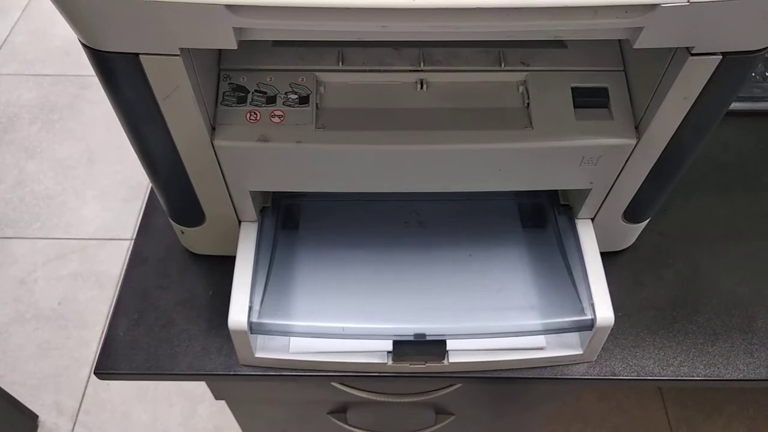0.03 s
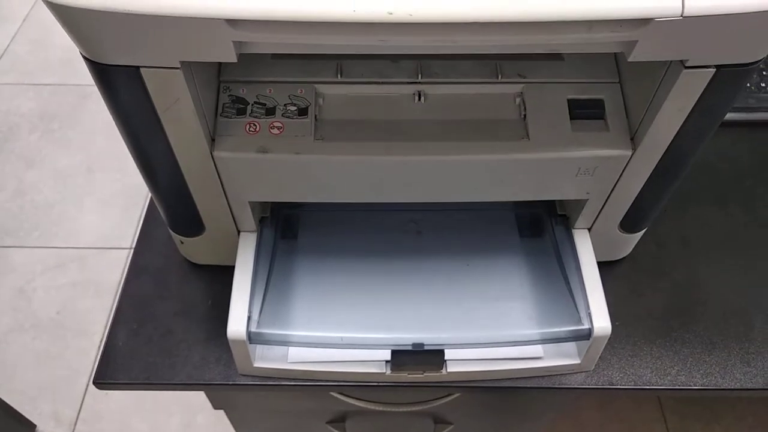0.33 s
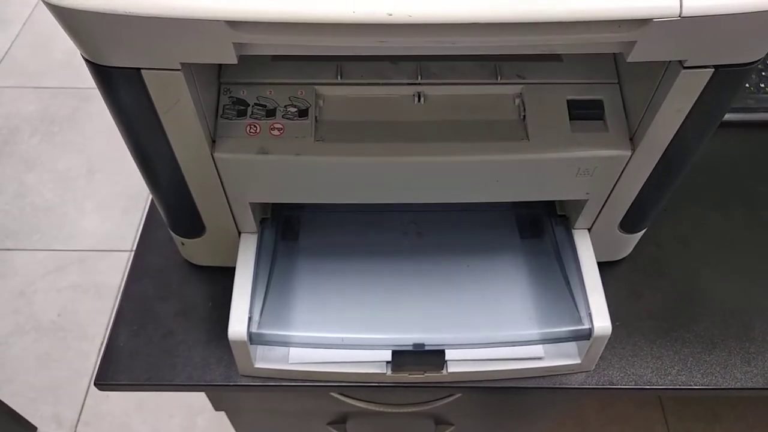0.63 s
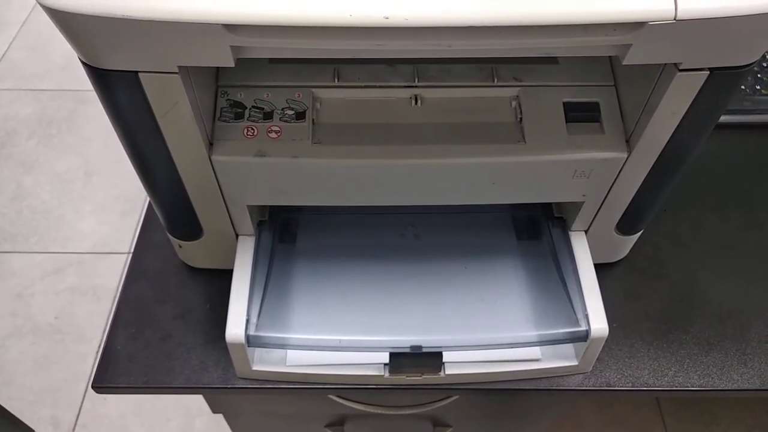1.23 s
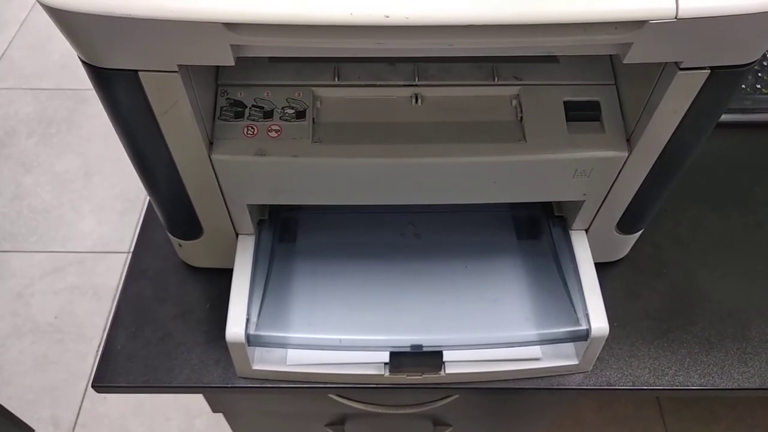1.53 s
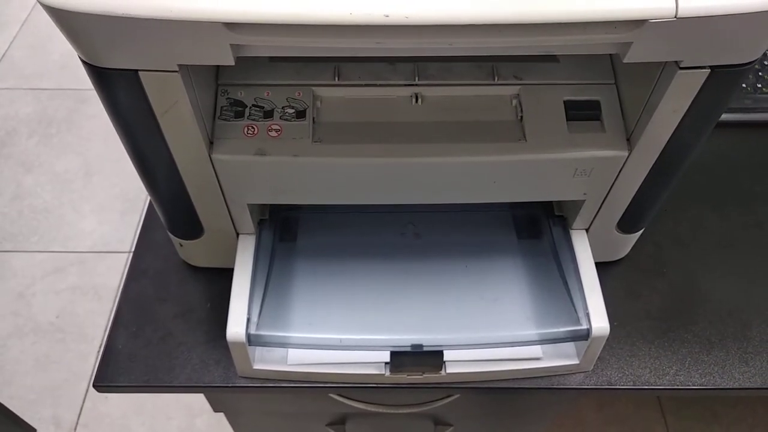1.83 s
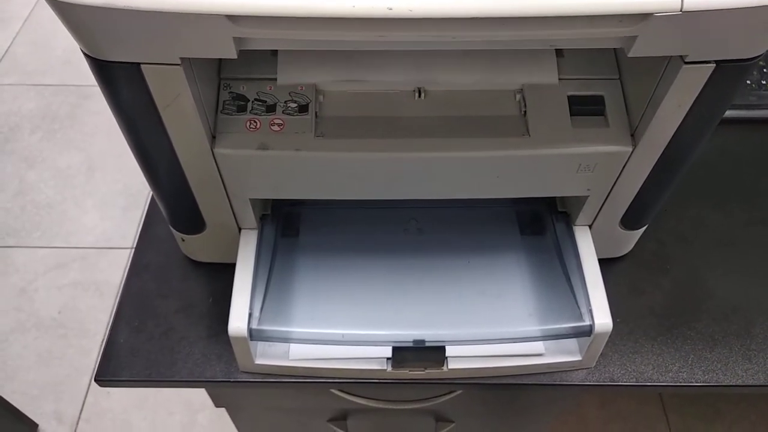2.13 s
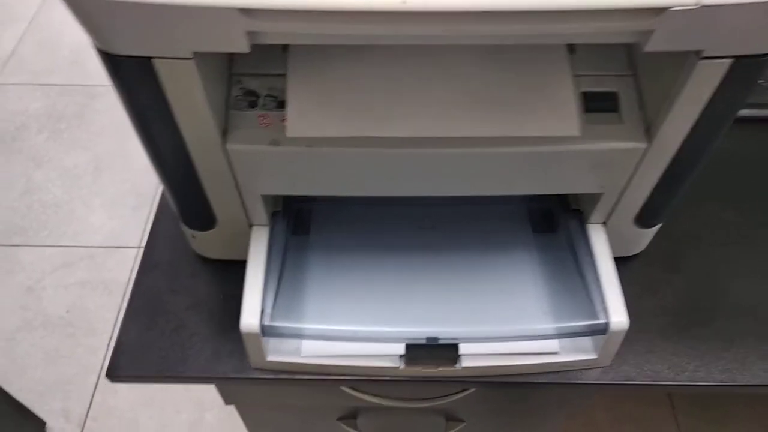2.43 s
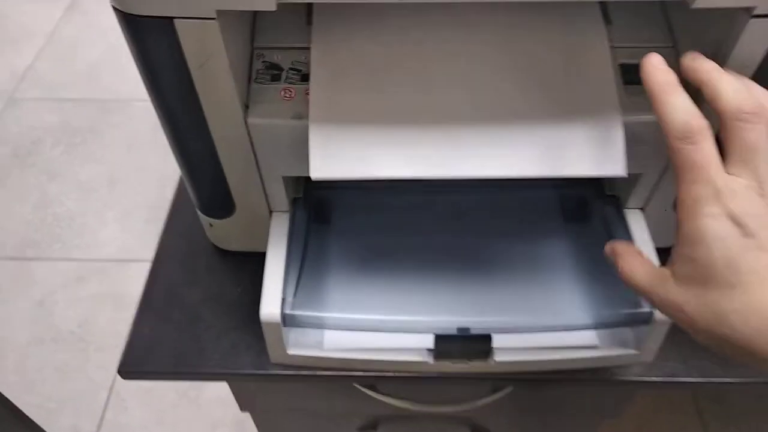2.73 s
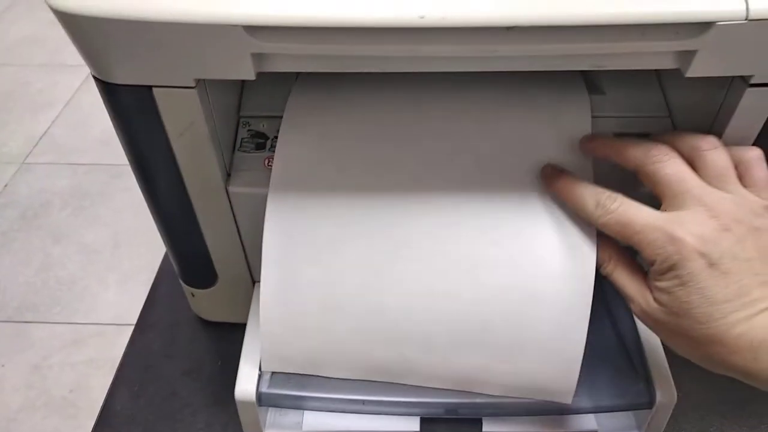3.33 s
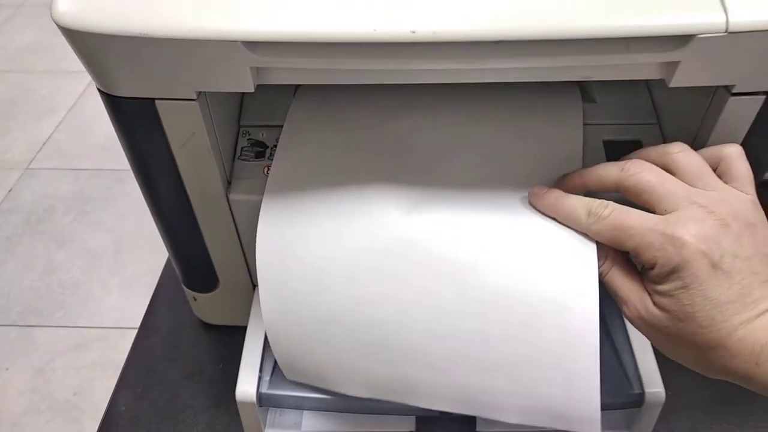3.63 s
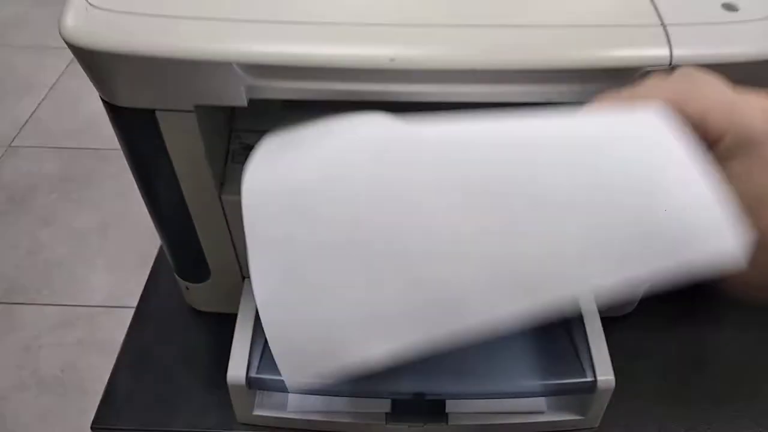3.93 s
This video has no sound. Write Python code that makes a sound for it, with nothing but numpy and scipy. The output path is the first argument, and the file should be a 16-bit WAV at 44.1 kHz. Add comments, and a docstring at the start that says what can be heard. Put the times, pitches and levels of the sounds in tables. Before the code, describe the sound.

Close above its tray in a small room, a printer hums while gears rattle briefly and paper hisses through the rollers. Scattered clicks lead to a single hard clack, and the sheet brushes softly against a hand.

```python
"""A small room, the microphone pair just above the tray of a desktop laser printer feeding out a sheet.
Paper rasps and hisses in the rollers, levers click and the feed gears rattle, over the hum of fan
and motors. The sheet brushes the guides and the hand that takes it. Late on, a sprung lever strikes
home with one hard clack that rings the plastic housing and overloads the right microphone."""
import sys
import numpy as np
from scipy import signal
from scipy.fft import rfft, irfft
from scipy.io import wavfile

SR = 44100
rng = np.random.default_rng(int(sys.argv[2]) if len(sys.argv) > 2 else 0)


def inscribe(sig):
    """Save sig as 16-bit PCM at rate SR to the path in sys.argv[1].

    A 1-D sig is mono; a 2-D sig holds one channel per row.
    Samples are clipped to [-1, 1] before scaling.
    """
    pcm = np.round(np.clip(np.atleast_2d(sig).T, -1, 1) * 32767)
    wavfile.write(sys.argv[1], SR, pcm.astype(np.int16))


N = 176400
TIME = np.arange(N) / SR


# The sheet's run through the rollers. Each row: time in seconds, rasp level in dB, hiss level in dB.
FEED_LEVELS = [(0, -64, -58.5), (.2, -59, -58.5), (.4, -60.5, -54), (.7, -59, -53), (1.05, -57, -54.5),
               (1.25, -56.5, -52.5), (1.85, -56.5, -51), (2.15, -56, -54.5), (2.45, -55, -55),
               (2.8, -55.5, -59), (3.15, -56.5, -56.5), (3.45, -63.5, -57.5), (4, -61.5, -57.5)]
# Roller rasp, then paper hiss, from close up. Each row: frequency in Hz, relative level in dB.
RASP_SPECTRUM = [(300, -24), (900, -6), (1500, 0.5), (2600, 0.5), (3300, -1.5), (4300, -4), (6000, -8),
                 (16000, -15)]
HISS_SPECTRUM = [(1500, -29), (4200, -8), (5600, -5), (7200, 1.5), (8300, -2), (9500, -7), (11500, -11),
                 (14000, -11), (16000, -30)]
# The sliding sheet's resonance. Each row: time in seconds, frequency in Hz, level in dB.
SHEET_RESONANCE = [(0, 1850, -60), (.85, 1850, -70), (1.15, 1800, -66), (1.19, 1750, -59),
                   (1.5, 1580, -57.5), (1.65, 1650, -65.5), (2.3, 1503, -59.5), (2.7, 1380, -62),
                   (2.95, 1380, -60), (3.2, 1300, -82), (4, 1300, -82)]
def paper(width_hz=430):
    """Friction in the rollers makes grainy noise; the sheet's resonance sinks as it comes out."""
    rasp, hiss = (evened(rng.standard_normal((2, N)) + amp(-5) * grains(per_s=1500, spread_db=-0.5))
                  for _ in range(2))
    rasp_db, hiss_db = curves(FEED_LEVELS)
    friction = amp(rasp_db) * colour(rasp, RASP_SPECTRUM) + amp(hiss_db) * colour(hiss, HISS_SPECTRUM)
    friction *= amp(0.82 * wander(rate_hz=39))
    hz, db = curves(SHEET_RESONANCE)
    carrier = np.exp(2j * np.pi * np.cumsum(hz) / SR)
    pole = np.exp(-np.pi * width_hz / SR)
    slips = signal.lfilter([1], np.poly([pole, pole]), grains(per_s=2000, spread_db=1.5))
    sheet = amp(db) * evened((carrier * slips).real)
    return at_microphones(friction + sheet)


CLACK_S = 3.2519
# The crack of the lever landing. Each row: frequency in Hz, relative level in dB.
CRACK_SPECTRUM = [(60, -31), (300, -2.5), (480, -24), (800, -6.5), (1300, 6.5), (2200, 2.5), (3300, -2.5),
                  (4500, -4), (6200, -4), (7500, -6), (9000, -13), (12000, -24), (16000, -21)]
# The plastic housing. Each row: frequency in Hz, relative level in dB, seconds to fall 60 dB.
HOUSING_MODES = [(308, -12.5, 0.134), (703, -17.5, 0.1), (993, -9, 0.081), (1320, 3.5, 0.057),
                 (1510, -25, 0.038), (1720, -28, 0.07), (2170, 7, 0.027), (2515, 2, 0.035),
                 (2790, 1, 0.022), (3470, -17, 0.026), (4323, -1, 0.04), (4800, -16, .025),
                 (5940, 9, 0.017), (6600, -2, 0.023)]
def clack(right_lag_s=0.00014):
    """A sprung lever strikes home and rings the housing: louder on the right, earlier on the left."""
    age = np.maximum(TIME - CLACK_S, 0)
    first_contact = 2.07 * (np.arange(N) == round(CLACK_S * SR))
    chatter = amp(-11) * (TIME >= CLACK_S) * np.exp(-age / 0.0014) * rng.choice([-1, 1], (2, N))
    crack = colour(first_contact + chatter, CRACK_SPECTRUM)
    ring = sum(amp(db - 60 * age / t60) * np.sin(2 * np.pi * hz * age) for hz, db, t60 in HOUSING_MODES)
    left, right = room(crack + amp(-24) * ring, tail_db=-21)
    return pan(-10.5) * np.array([left, np.roll(right, round(right_lag_s * SR))])


# Clicks just under the microphones. Each row: start in seconds, knock level in dB, knock centre in Hz,
# snap level in dB, snap centre in Hz, decay in seconds, pan to the left in dB.
LEVER_CLICKS = [(.122, -41.5, 1400, -34, 7300, 0.0061, -4), (.128, -37, 1200, -49, 6000, 0.0073, -1),
                (.138, -45, 190, -58, 6000, 0.018, 5), (0.194, -45.5, 1900, -37, 7800, 0.0092, 0.5),
                (.433, -41, 1660, -52, 5040, 0.0047, 4), (.647, -42, 950, -62, 5000, 0.0056, -1),
                (1.175, -44, 1780, -43, 6100, 0.0048, -2), (1.542, -44, 2800, -33.5, 7900, 0.0029, -2),
                (1.640, -49, 2500, -36.5, 7900, 0.0022, -8), (2.049, -44.5, 2000, -44, 6500, 0.004, -6),
                (2.053, -34.5, 2210, -27.5, 6650, 0.002, -6.5), (2.06, -42, 1410, -55, 5000, 0.0066, -1),
                (2.207, -54, 1400, -49, 6000, 0.0054, -1), (2.328, -45, 2140, -32, 8000, 0.0075, -1),
                (2.422, -44.5, 2030, -41, 8000, 0.0046, 2), (2.517, -41, 2300, -36, 6400, 0.0042, 0),
                (2.522, -27.5, 2400, -31, 5800, 0.0019, -2.5), (2.527, -42, 620, -51, 4500, 0.0046, 0.5),
                (2.956, -28, 2320, -34, 5740, 0.0029, -5), (3.116, -54, 2300, -40, 8770, 0.0074, 0),
                (3.238, -33, 2180, -34, 5870, 0.0039, -3), (3.2445, -29, 2080, -38, 5740, .002, -9),
                (3.2513, -19, 2130, -16.5, 5930, .002, 1), (3.300, -36, 1500, -38, 5770, .0025, -5),
                (3.306, -31.5, 1500, -54, 5000, 0.0022, -3), (3.377, -39.5, 950, -60, 5000, .004, -3.5)]
def clicks():
    """Levers and paper edges strike: each gives a knock of the housing and a bright snap."""
    knocks, snaps = np.zeros((2, 2, N))
    for start, knock_db, knock_hz, snap_db, snap_hz, decay_s, pan_db in LEVER_CLICKS:
        knock = burst(decay_s, hump(knock_hz, rise=5.3, fall=10))
        snap = burst(decay_s, hump(snap_hz, rise=14.9, fall=16.8))
        add(knocks, start, pan(pan_db) * amp(knock_db) * knock)
        add(snaps, start, pan(pan_db) * amp(snap_db) * snap)
    return at_microphones(knocks) + snaps


# Strokes of the sheet, heard to the right.
# Each row: start in seconds, length in seconds, level in dB, centre in Hz.
SHEET_STROKES = [(0.207, 0.29, -51.5, 6820), (0.507, .035, -54, 4800), (1.172, 0.022, -51, 1800),
                 (2.19, .07, -51.5, 6500), (3.02, 0.2, -54, 5900), (3.115, .04, -53.5, 9000),
                 (3.274, 0.11, -54.5, 6500), (3.51, 0.096, -51, 5700), (3.75, 0.022, -47.5, 7200),
                 (3.785, 0.08, -54.5, 7500), (3.937, .025, -52, 6000)]
def brushes(flutter_db=2.5):
    """The sheet sticks and slips on the guides and the hand; the tiny slips excite its resonances."""
    out = np.zeros((2, N))
    slips = evened(grains(per_s=7500, spread_db=3) * amp(flutter_db * wander(rate_hz=70)))
    for start, length, db, hz in SHEET_STROKES:
        stroke = (swell(start, length, db) * slips)[:, round(start * SR):round((start + length) * SR)]
        add(out, start, colour(stroke, hump(hz, rise=20, fall=16, peak_db=6)))
    return pan(-6) * out


# Bursts of rattle from the feed gears. Each row: start in seconds, length in seconds, level in dB.
GEAR_RATTLES = [(-.015, .055, -46), (.125, 0.024, -53), (.37, 0.12, -57.5), (.535, 0.018, -53.5),
                (.59, 0.043, -51), (.63, 0.031, -52), (2.2, .05, -51)]
# The rattle, then its rumble in the desk. Each row: frequency in Hz, relative level in dB.
RATTLE_SPECTRUM = [(60, 3), (150, -11), (400, -3.5), (700, 1), (1100, 0), (1600, 1.5), (2200, 2),
                   (3000, -6.5), (5000, -16), (9000, -17), (16000, -49)]
RUMBLE_SPECTRUM = [(20, -14), (40, -10), (60, 6), (90, -6), (150, 0), (300, -12), (800, -8), (3000, -30)]
def gears():
    """The feed gears rattle in runs of tiny impacts and, at the start, rumble through the desk."""
    impacts = sum(swell(*row) for row in GEAR_RATTLES) * grains(per_s=830, spread_db=-1.5)
    rumble = swell(start=0, length=0.7, db=-62.5) * rng.standard_normal((2, N))
    return at_microphones(colour(impacts, RATTLE_SPECTRUM) + colour(rumble, RUMBLE_SPECTRUM))


# The hum behind the paper. Each row: frequency in Hz, level in dB at first, level in dB once the
# microphones have leaned in, pan to the left in dB, pitch wander in Hz.
MOTOR_TONES = [(58, -77, -76, 2.5, 1.86), (68.4, -66.5, -71, 1, 0.98), (170, -72.5, -78.5, 6, 2.16),
               (277.3, -72.5, -68, 0, 1.87), (289.3, -67.5, -64.5, 1.5, 2.03), (303.4, -58, -55, 2, 0.61),
               (559, -74, -73.5, 2.5, 0.82), (1026, -70.5, -69, -9.5, 1.9),
               (2080, -67.5, -61.5, -7.5, 0.88), (2190, -67.5, -87, 5.5, 1.44), (6330, -72, -90, -8, 4),
               (15353, -73, -79, 0, 25), (15655, -73, -80, 8, 25)]
# Air from the fan. Each row: frequency in Hz, relative level in dB.
AIR_SPECTRUM = [(20, -7), (40, -12), (65, -3), (130, 2), (230, 1), (330, 1), (410, -10), (520, -8.5),
                (800, -10.5), (1020, -9), (1200, -11), (1700, -14), (2150, -7), (3300, -16.5),
                (8000, -22.5), (16000, -28)]
def fan_and_motors(lean_start_s=2.47, lean_takes_s=0.29):
    """Wavering tones over the rush of cooling air; their balance shifts as the microphones lean in."""
    out = amp(-56) * at_microphones(colour(rng.standard_normal((2, N)), AIR_SPECTRUM))
    lean = np.clip((TIME - lean_start_s) / lean_takes_s, 0, 1)
    for hz, first_db, last_db, pan_db, wander_hz in MOTOR_TONES:
        phase = 2 * np.pi * np.cumsum(hz + wander_hz * wander(rate_hz=7.8)) / SR
        level = amp(first_db + (last_db - first_db) * lean + 0.64 * wander(rate_hz=7.4))
        right_shift = np.arccos(np.clip(read(PAIR_LIKENESS, hz), -1, 1))
        out += np.sqrt(2) * level * pan(pan_db) * np.sin([phase, phase + right_shift])
    return out


# The small room's tail. Each row: frequency in Hz, seconds to fall 60 dB.
ROOM_DECAY = [(100, 0.54), (500, 0.34), (1400, 0.24), (4000, 0.16), (10000, 0.08), (16000, 0.047)]
def room(x, tail_db, early_db=-14, early_decay_s=0.0037):
    """Tray and desk throw back quick reflections; the room adds a tail whose treble dies first."""
    t = np.arange(SR // 2) / SR
    arrivals = (rng.random((2, 2, len(t))) < 3000 / SR) * (t > 0.002)
    early, tail = rng.standard_normal(arrivals.shape) * arrivals
    early *= np.exp(-t / early_decay_s)
    hz, age, bands = signal.stft(tail, SR, nperseg=256)
    bands *= amp(-60 * age / read(ROOM_DECAY, hz)[:, None])
    tail = signal.istft(bands, SR, nperseg=256)[1][:, :len(t)]
    echo = amp(early_db) * unit_energy(early) + amp(tail_db) * unit_energy(tail)
    return x + signal.oaconvolve(x, echo, axes=1)[:, :N]


# How alike the two microphones sound. Each row: frequency in Hz, correlation (capped at 1 in use).
PAIR_LIKENESS = [(60, 1.2), (240, 1), (480, 0.89), (950, 0.52), (1900, 0.2), (4000, 0)]
# Their balance above the tray. Each row: frequency in Hz, left over right in dB.
PAIR_BALANCE = [(60, -1), (480, 1.5), (950, -1), (1900, -3), (3700, -9.5), (5500, -8), (8000, -6),
                (9500, -1.5), (11500, 7), (13500, -1.5), (16000, 2)]
def at_microphones(x):
    """Two unrelated signals as the pair hears the printer: bass shared, treble mostly right."""
    hz = np.fft.rfftfreq(N, 1 / SR)
    left, unrelated = rfft(x)
    likeness = np.clip(read(PAIR_LIKENESS, hz), -1, 1)
    right = likeness * left + np.sqrt(1 - likeness ** 2) * unrelated
    tilt = amp(read(PAIR_BALANCE, hz) / 2)
    return irfft(np.array([left * tilt, right / tilt]), N)


def amp(db):
    """Decibels to gain."""
    return 10 ** (np.asarray(db) / 20)


def evened(x):
    """Scales to rms 1."""
    return x / np.sqrt(np.mean(x ** 2) + 1e-20)


def unit_energy(x):
    """Scales each channel to energy 1."""
    return x / np.linalg.norm(x, axis=-1, keepdims=True)


def read(points, hz):
    """Reads a table on a log-frequency axis."""
    table_hz, value = np.transpose(points)
    return np.interp(np.log(hz + 1), np.log(table_hz + 1), value)


def curves(rows):
    """Each column of a time table, sample by sample."""
    times, *columns = np.transpose(rows)
    return [np.interp(TIME, times, column) for column in columns]


def pan(db):
    """Left and right gains; positive dB favours the left."""
    return amp(np.array([[db], [-db]]) / 2)


def wander(rate_hz):
    """Smooth random motion of rms 1."""
    hz = np.fft.rfftfreq(N, 1 / SR)
    return evened(irfft(rfft(rng.standard_normal(N)) / (1 + (hz / rate_hz) ** 2), N))


def colour(x, spectrum):
    """Minimum-phase filter of unit energy with the given spectral shape."""
    log_gain = np.log(amp(read(spectrum, abs(np.fft.fftfreq(4096, 1 / SR)))))
    response = np.exp(signal.hilbert(log_gain).conj())
    taps = unit_energy(np.fft.ifft(response).real[:2048])
    return signal.oaconvolve(x, taps[None], axes=1)[:, :N]


def hump(centre_hz, rise, fall, peak_db=0):
    """A spectrum that rises to its centre and falls beyond it, both in dB per octave."""
    octaves = np.array([-6, -0.25, 0, 0.25, 5])
    db = np.where(octaves < 0, rise, -fall) * octaves + peak_db * (octaves == 0)
    return np.transpose([centre_hz * 2 ** octaves, db])


def grains(per_s, spread_db):
    """Random tiny impacts of uneven size."""
    size = amp(spread_db * np.minimum(rng.exponential(1, (2, N)), 4))
    return evened(size * rng.choice([-1, 1], (2, N)) * (rng.random((2, N)) < per_s / SR))


def swell(start, length, db):
    """One rounded rise and fall, timed in seconds."""
    progress = np.clip((TIME - start) / length, 0, 1)
    return amp(db) * np.sqrt(abs(np.sin(np.pi * progress)))


def burst(decay_s, spectrum):
    """A dying puff of coloured noise whose energy grows with its decay time."""
    t = np.arange(SR // 10) / SR
    puff = colour(np.exp(-t / decay_s) * rng.standard_normal((2, len(t))), spectrum)
    return unit_energy(puff) * np.sqrt(decay_s * SR / 2)


def add(mix, start, sound):
    """Mixes a sound in at a start in seconds."""
    part = mix[:, round(start * SR):][:, :sound.shape[1]]
    part += sound[:, :part.shape[1]]


def scene():
    """The whole printer, from just above its tray."""
    return paper() + clack() + room(clicks() + gears(), tail_db=-9) + brushes() + fan_and_motors()


def record(dry, recovery_s=0.041, cutoff_hz=15950):
    """The clack knocks the right microphone's signal off centre; both channels are clipped and low-passed."""
    age = np.maximum(TIME - CLACK_S, 0)
    onset = 1 - np.exp(-age / 0.0018)
    swing_back = (1 - age / recovery_s) * np.exp(-age / recovery_s)
    left, right = dry
    clipped = np.clip([left, right - 0.26 * onset * swing_back], -1, 1)
    lowpass = signal.firwin(511, cutoff_hz, window=("kaiser", 9), fs=SR)
    return signal.oaconvolve(clipped, lowpass[None], "same")


dry = scene()
out = record(dry)
inscribe(out)
```